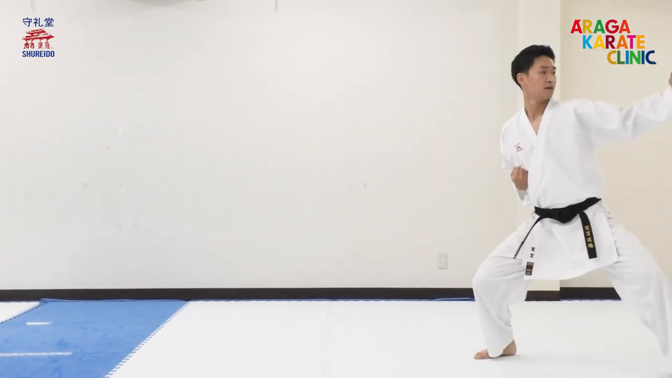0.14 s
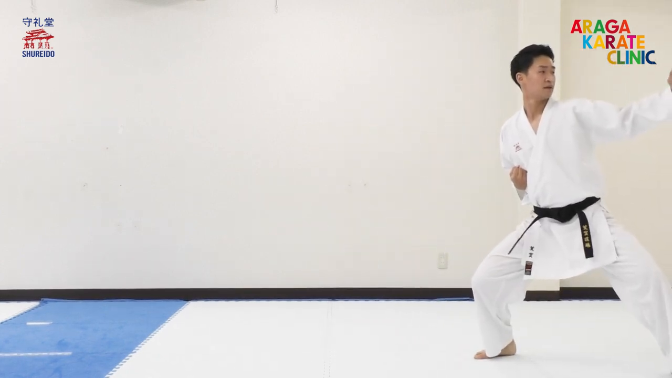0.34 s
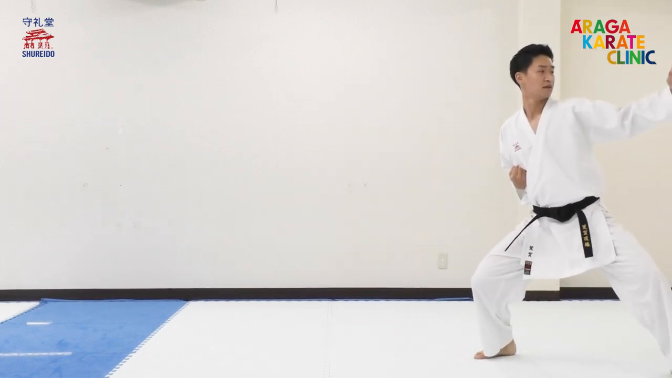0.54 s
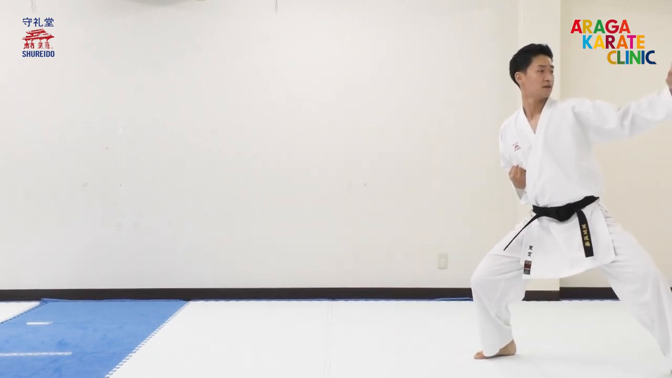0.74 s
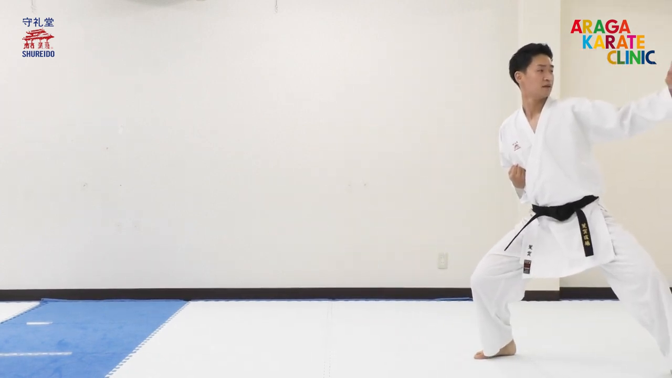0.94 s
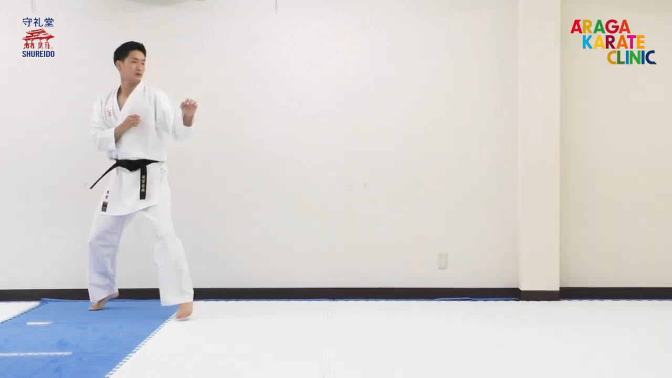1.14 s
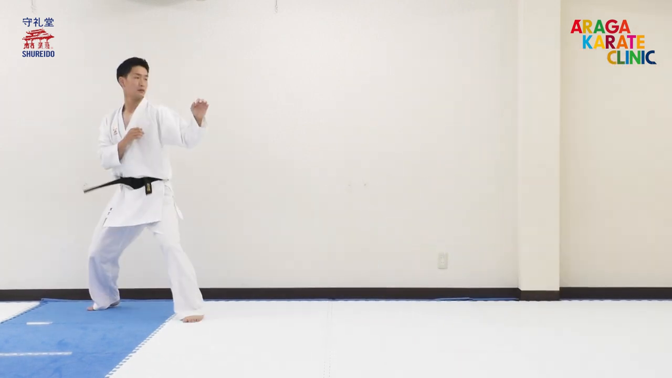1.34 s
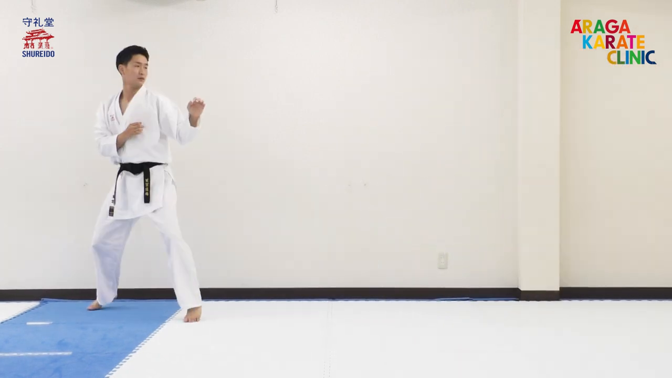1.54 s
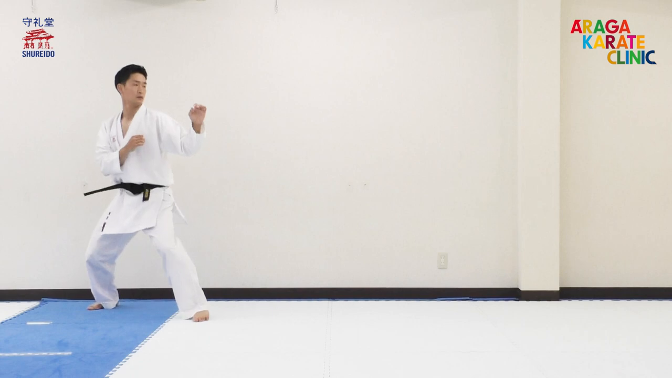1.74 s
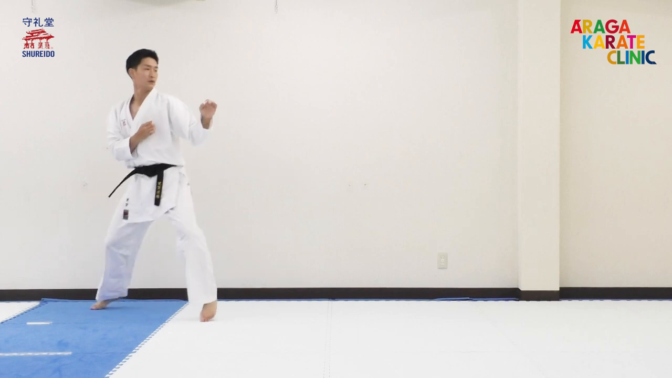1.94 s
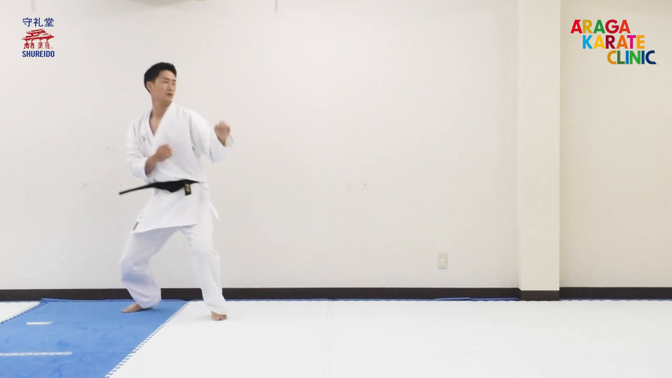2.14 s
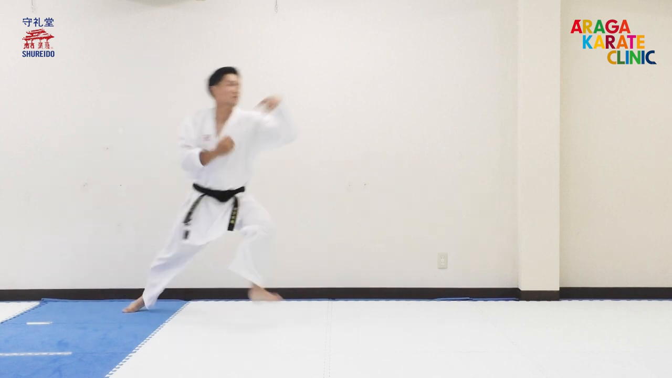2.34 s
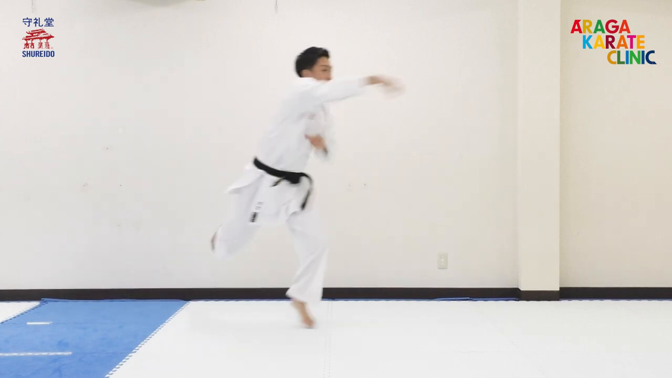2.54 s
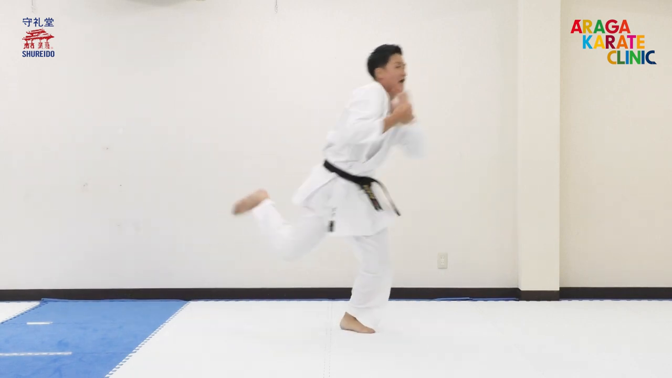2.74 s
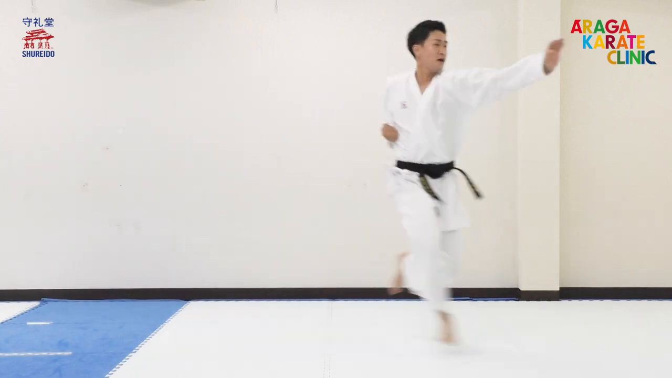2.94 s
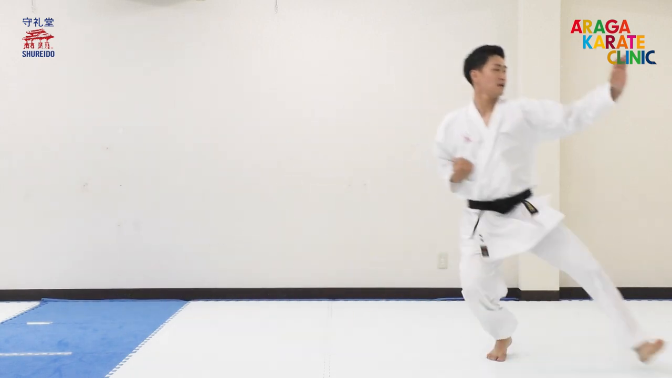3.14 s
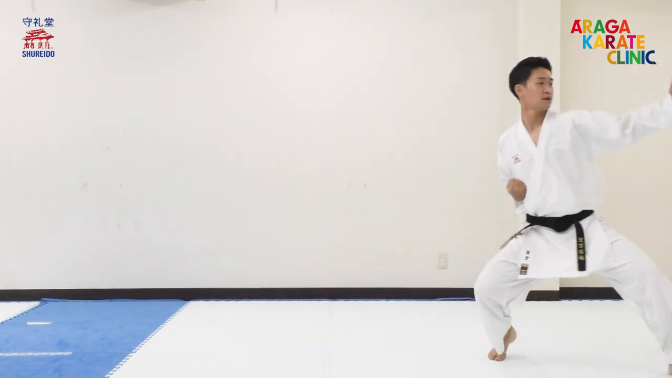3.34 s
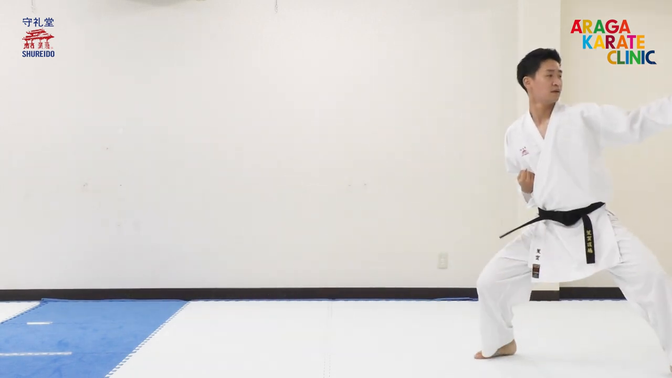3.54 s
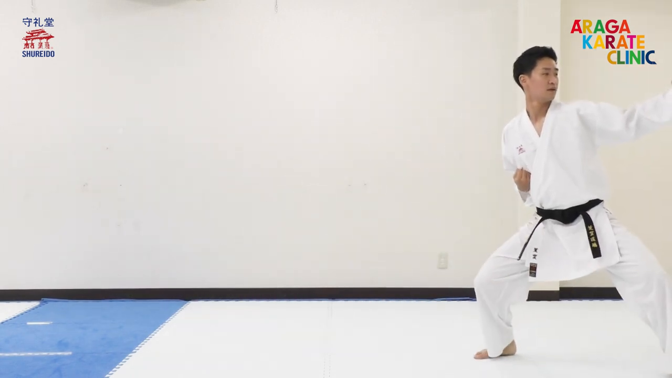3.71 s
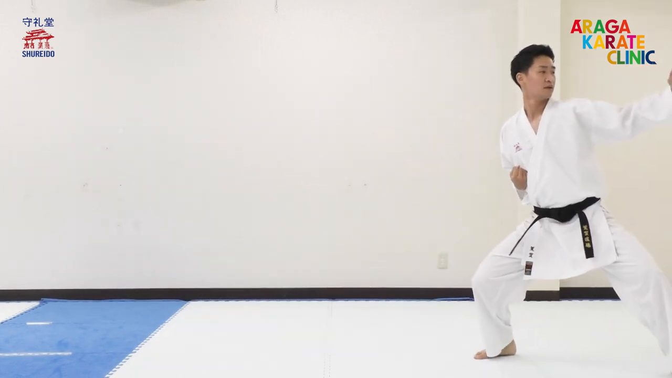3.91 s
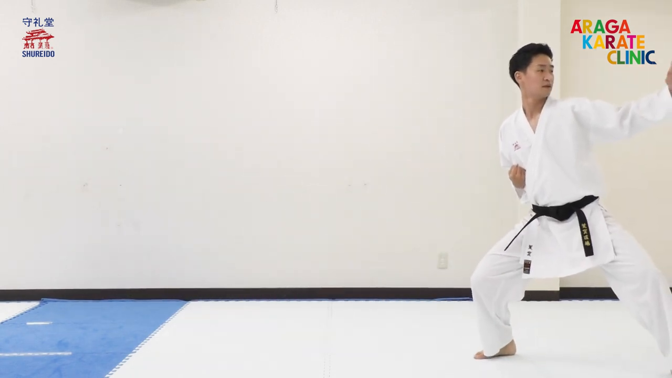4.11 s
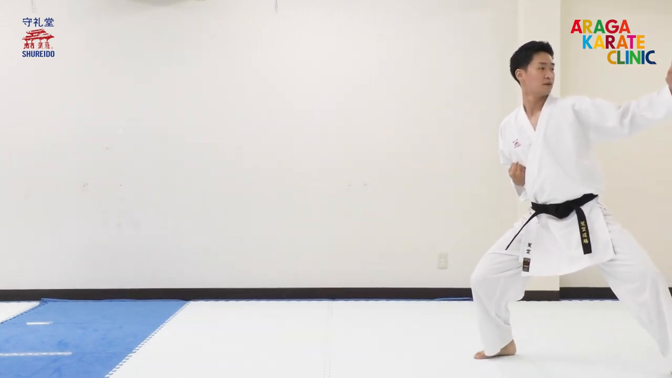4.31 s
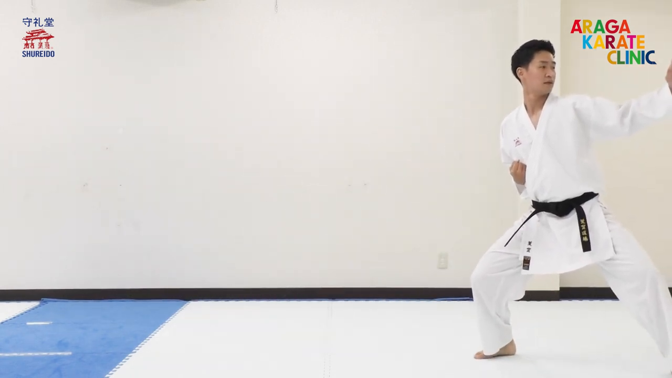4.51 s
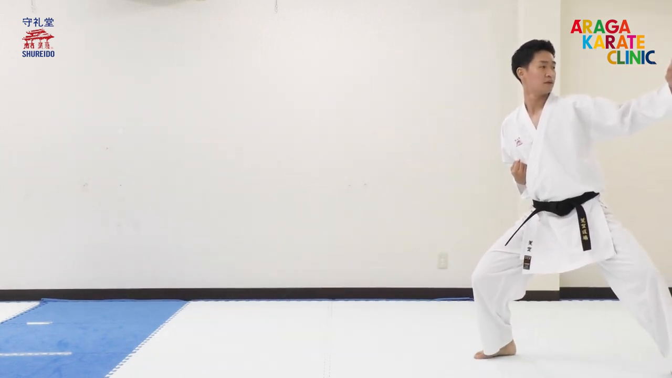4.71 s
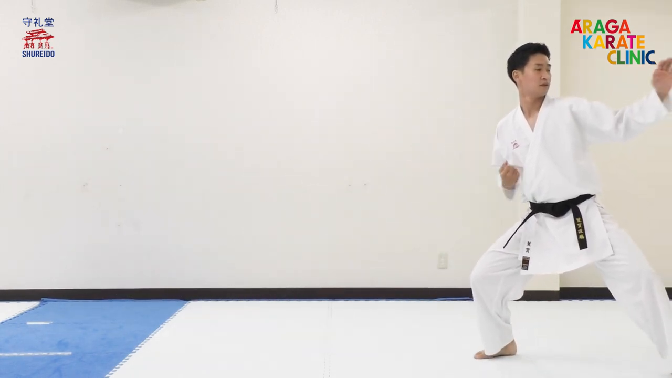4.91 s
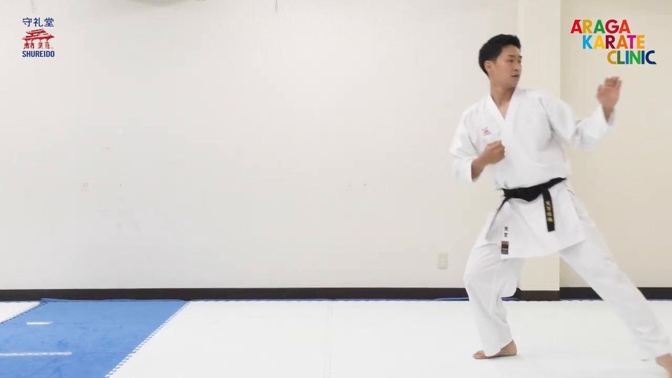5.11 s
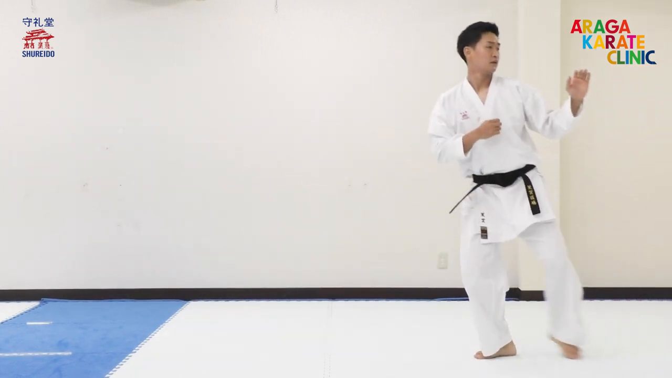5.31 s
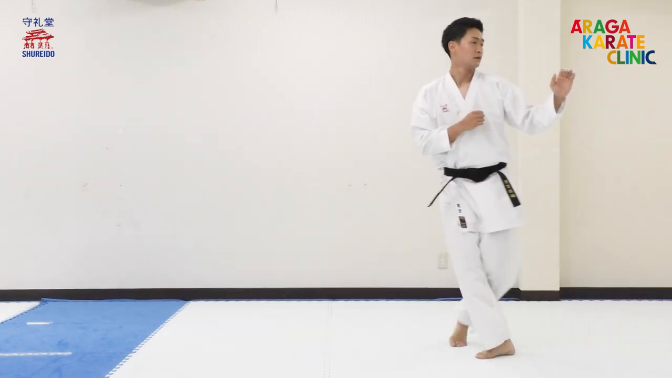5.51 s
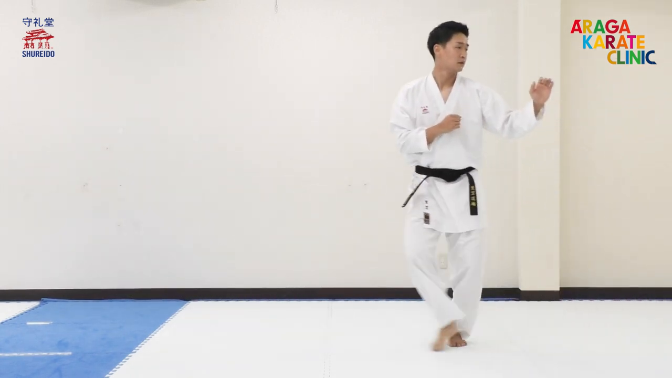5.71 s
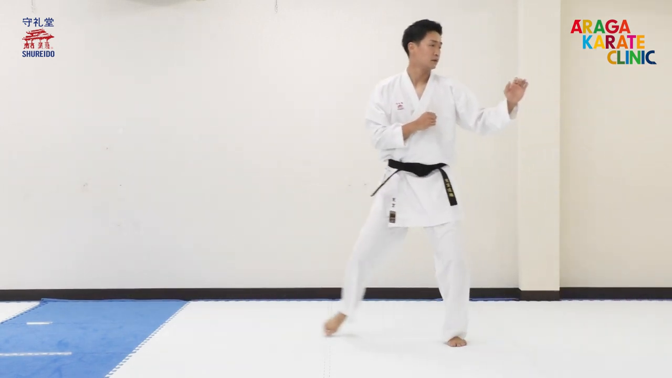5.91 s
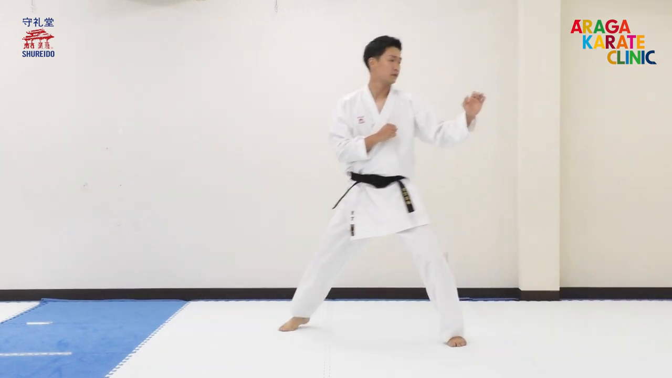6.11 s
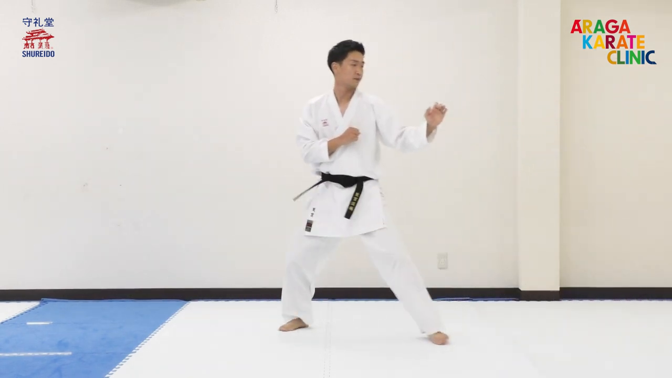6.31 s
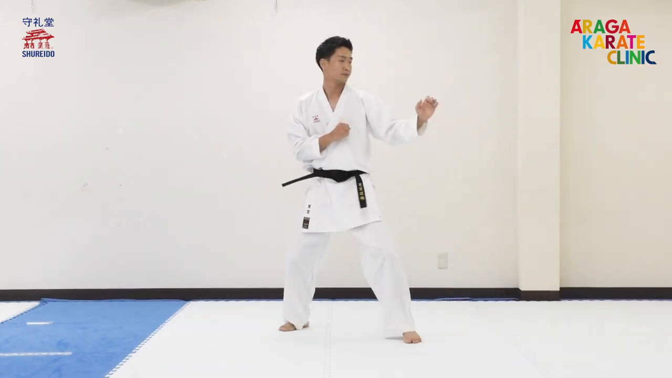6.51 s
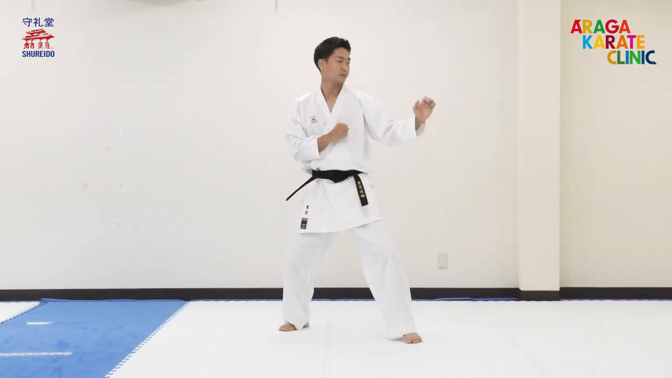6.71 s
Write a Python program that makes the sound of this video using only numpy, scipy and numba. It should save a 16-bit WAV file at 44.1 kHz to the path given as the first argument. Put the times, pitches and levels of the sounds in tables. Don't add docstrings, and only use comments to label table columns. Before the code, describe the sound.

A bare training room with a mat on a sprung floor, heard in stereo from a few metres. Until 1.1 s there is only very faint, dull distant rumble. Then the background cuts to soft low ventilation, with tiny ticks and scuffs of bare feet at 1.15-1.3 s and a light hop near 2.0-2.15 s. At 2.31-2.36 s stiff cotton snaps sharply; at 2.47 s the first lunge lands, a hard slap with a deep wooden boom. Boards knock and rumble unevenly as cloth flaps, until a contact at 3.06 s and the second stamp at 3.28 s, slightly duller, rattling away by 3.6 s. Only ventilation remains until 5.0 s. A trailing sole hisses along the mat at 5.2-5.4 s, a soft thud and rustle come at 5.6 s, a short skid at 5.77 s, faint shuffles near 6.2 s, and another airy drag from 6.35 s to the end.

```python
import sys
import numpy as np
from scipy import signal
from scipy.fft import rfft, irfft, next_fast_len
from scipy.io import wavfile
from scipy.ndimage import uniform_filter1d
from numba import njit

SR = 44100
rng = np.random.default_rng(int(sys.argv[2]) if len(sys.argv) > 2 else 0)


def amplitude_ratio(level_db):
    exponent = np.asarray(level_db, float) / 20
    return 10 ** exponent


def inscribe(sig):
    pcm = np.round(np.clip(np.atleast_2d(sig).T, -1, 1) * 32767)
    wavfile.write(sys.argv[1], SR, pcm.astype(np.int16))


N = 297670

# (frequency [Hz], density [dB per Hz])
WEAVE = [(1120, -26.5), (1900, -3.5), (2120, -5.5), (2340, 1), (2600, -3), (2960, -2), (4600, -15),
         (5980, -31.5), (10100, -120)]
# (frequency [Hz], density [dB per Hz])
SLOW_WEAVE = [(1500, -10), (2150, -1.5), (2600, -1), (3000, -3.5), (3400, -14.5), (5000, -18), (7000, -28)]


def unit(x):
    return x / np.sqrt(np.mean(x ** 2))


def gains_db(points, size):
    hz, db = np.transpose(points)
    bin_hz = np.arange(size // 2 + 1) * SR / size
    return np.interp(np.log(bin_hz + 1), np.log(hz), db)


def colour(x, points, size=4096):
    cepstrum = irfft(np.maximum(gains_db(points, size), -90) * np.log(10) / 20)
    cepstrum[1:size // 2] *= 2
    cepstrum[size // 2 + 1:] = 0
    h = irfft(np.exp(rfft(cepstrum)))
    return signal.oaconvolve(x, h / np.sqrt(np.sum(h ** 2)))[:N]


def ring(x, modes, rise_ms):
    t = np.arange(SR // 3) / SR
    h = np.zeros(len(t))
    for k, (hz, db, t60) in enumerate(modes):
        h += (-1) ** k * amplitude_ratio(db) * np.sin(2 * np.pi * hz * t) * 1000. ** (-t / t60)
    h = h * np.sin(np.pi / 2 * np.clip(t * 1000 / rise_ms, 0, 1)) ** 2
    h = signal.sosfilt(signal.butter(4, .8 * modes[0][0], "high", fs=SR, output="sos"), h)
    return signal.oaconvolve(x, h / np.sqrt(np.sum(h ** 2)))[:N]


def walk(rate):
    hold = int(SR / rate)
    steps = np.repeat(rng.standard_normal(N // hold + 1), hold)
    return 0.73 * uniform_filter1d(uniform_filter1d(steps, hold), hold)[:N]


def grains(rate, scatter_db, flutter_db, flutter_rate):
    hit = rng.random(N) < rate / SR
    size = amplitude_ratio(scatter_db * rng.exponential(size=N)) * rng.standard_normal(N)
    return unit(hit * size * amplitude_ratio(flutter_db * walk(flutter_rate)))


def strokes(rows, bend):
    onset_bend = 2
    t = np.arange(0, N + 32, 16) / SR
    s, db, rise_ms, fall_ms, tone = np.array(rows)[:, [0, 1, 2, 3, -1], None].transpose(1, 0, 2)
    late_ms = (t - s) * 1000
    away = np.abs(late_ms) / np.maximum(np.where(late_ms < 0, rise_ms, fall_ms), 1)
    level_db = db - 20 * away ** np.where(late_ms < 0, onset_bend, bend)
    power = amplitude_ratio(2 * np.maximum(level_db, -150))
    total = power.sum(axis=0)
    curves = 10 * np.log10(total), (power * tone).sum(axis=0) / total
    return [np.interp(np.arange(N) / SR, t, curve) for curve in curves]


def air(points, side_points, db, swell_db):
    size = 2 * next_fast_len(N // 2 + 1)
    bin_hz = np.arange(size // 2 + 1) * SR / size
    bass = 1 / (1 + (bin_hz / 300) ** 4)
    mid, side = rfft(rng.standard_normal((2, size))) * amplitude_ratio(gains_db(points, size))
    both = mid + side * amplitude_ratio(gains_db(side_points, size)) * np.array([[1], [-1]])
    low = irfft(both * bass)[:, :N] * amplitude_ratio(swell_db * walk(3.2))
    high = irfft(both * (1 - bass))[:, :N] * amplitude_ratio(0.13 * swell_db * walk(7.5))
    return unit(low + high) * amplitude_ratio(db)


def outdoor_rumble():
    # (frequency [Hz], density [dB per Hz])
    rumble = [(12, -55), (20, -14), (64, -7.5), (122, -12.5), (148, -20), (187, -28), (452, -26),
              (573, -28), (819, -32), (990, -38.5), (2570, -48), (4760, -41.5), (5900, -52), (7670, -76),
              (13000, -120)]
    # (frequency [Hz], side minus mid [dB])
    rumble_side = [(60, -7.5), (110, -6), (200, 1), (380, -0.5), (700, -3), (1290, -2), (2380, -10),
                   (4400, 1), (8120, 3), (15000, 0)]
    still = air(rumble, rumble_side, -61.5, swell_db=1.0)
    return signal.sosfilt(signal.ellip(8, .3, 50, 6150, fs=SR, output="sos"), still)


def ventilation():
    # (frequency [Hz], density [dB per Hz])
    duct = [(12, -48.5), (20, -28), (90, -9.5), (116, -12.5), (141, -9), (167, -1.5), (395, -10.5),
            (523, -20.5), (730, -23.5), (794, -30), (965, -22), (1940, -25.5), (4730, -39.5), (10000, -43),
            (15700, -36.5)]
    # (frequency [Hz], side minus mid [dB])
    duct_side = [(60, -10), (110, -2.5), (200, -10), (380, -7), (700, 1), (1290, -1), (2380, -1),
                 (4400, -1), (8120, -15), (15000, -1.5)]
    fan_hz, fan_db = 1970, -87
    t = np.arange(N) / SR
    fan = amplitude_ratio(fan_db) * np.sin(2 * np.pi * fan_hz * t + .8 * walk(2.7))
    return air(duct, duct_side, -61, swell_db=-1.5) + fan


def room(x):
    # (band centre [Hz], t60 [s], level [dB], side level [dB])
    bands = [(64.7, 0.6, 1, 2), (187, 0.83, -2.5, -15), (514, 0.3, 2, 0.5), (1395, 0.051, 7, 7.5),
             (3933, 0.62, 2.5, 1.5), (9990, .3, -20, 5.5)]
    t = np.arange(SR // 2) / SR
    tail = 0
    for hz, t60, db, side_db in bands:
        band = signal.butter(2, [hz / 1.7, min(hz * 1.7, 20000)], "band", fs=SR, output="sos")
        noise = signal.sosfilt(band, rng.standard_normal((2, len(t))))
        tail = tail + amplitude_ratio([[db], [db + side_db]]) * noise * 1000. ** (-t / t60) / np.sqrt(t60)
    tail = tail * np.clip((t - .003) / 0.0048, 0, 1) * amplitude_ratio(-49.5)
    mid, side = signal.fftconvolve(x[None], tail)[:, :N]
    return mid + side * np.array([[1], [-1]])


def mat_bounce(x):
    bounce = np.roll(signal.sosfilt(signal.butter(2, 5000, "high", fs=SR, output="sos"), x), 60)
    return amplitude_ratio(-9.5) * bounce * np.array([[1], [-1]])


def rebounds():
    # (peak time [s], level [dB], pitch [Hz], length [ms])
    rebound_knocks = [(2.4775, -12, 286, 27), (2.5182, -20.7, 290, 9.4), (2.5388, -26.5, 265, 8),
                      (2.5573, -20, 336, 14), (2.5713, -13.5, 304, 13), (2.59, -12, 233.5, 26),
                      (2.6221, -21.8, 260, 13), (2.6508, -18.5, 230, 11), (2.6794, -15.5, 290, 7.8),
                      (2.6932, -18, 228, 25), (2.7116, -20.5, 278, 21), (2.747, -14.5, 268, 5.1),
                      (2.769, -19, 271, 6.2), (2.797, -18, 250, 20), (2.8232, -12.5, 248, 5.6),
                      (2.8366, -19.3, 233, 12), (2.8578, -17, 210, 4.9), (2.873, -29.5, 302, 12),
                      (2.888, -26, 299, 3.9), (2.9099, -26, 261, 22), (2.9309, -23.5, 268, 8.9),
                      (2.9428, -32, 226, 19), (2.9593, -30, 291, 26), (2.9878, -35.8, 286, 6.3),
                      (3.018, -38.5, 233, 8.1), (3.041, -29, 262, 10), (3.0899, -22, 369, 25),
                      (3.1167, -31.1, 280, 3), (3.1335, -27.5, 384, 25), (3.1524, -30, 375, 7.5),
                      (3.171, -28, 324, 7.6), (3.197, -29, 319, 5.8), (3.2245, -32, 276, 29),
                      (3.242, -32, 316, 14), (3.2566, -48, 376, 8), (3.2852, -15.5, 268, 24),
                      (3.3042, -26, 273, 5.6), (3.3282, -22.5, 277, 32), (3.3481, -15, 214, 6.2),
                      (3.3677, -20, 227, 5.3), (3.381, -16.5, 222, 10.4), (3.4008, -15, 218, 16.4),
                      (3.437, -28.5, 229, 5.9), (3.4647, -29.1, 274, 19), (3.5021, -26.5, 226, 26),
                      (3.5268, -29, 232, 11.5), (3.5448, -32, 245, 23),
                      (2.481, -17, 162, 40),
        (3.33, -25, 165, 40),
        (5.602, -44.5, 411, 23),
        (5.614, -43, 188, 22),
        (5.644, -48, 151, 23),
    ]
    out = np.zeros(N)
    before = 1500
    late_ms = np.arange(-before, 4000) / SR * 1000
    for s, db, hz, ms in rebound_knocks:
        swell = np.exp(-(late_ms / min(0.38 * ms, 5)) ** 2)
        decay = 1 / np.cosh(late_ms / (0.42 * ms))
        shape = np.where(late_ms < 0, swell, decay)
        i = int(s * SR) - before
        out[i:i + len(shape)] += amplitude_ratio(db - 4) * shape * np.cos(2 * np.pi * hz * late_ms / 1000)
    return signal.sosfilt(signal.butter(2, 90, "high", fs=SR, output="sos"), out)


def floor():
    # (frequency [Hz], level [dB], t60 [s])
    boards = [(157.9, -2.5, 0.12), (185.4, -17, 0.58), (215.4, -1.5, 0.089), (259, -1, 0.077),
              (313.5, -3.5, 0.079), (347, -3, 0.042)]
    upper_boards = [(387.4, -0.5, 0.073), (428.8, 7, 0.047), (490, 0, 0.055), (565, -0.5, 0.041),
                    (643, -11.5, 0.048), (730, -40.5, 0.04)]
    joists = [(51.6, -1, 0.29), (72, -9.5, 0.099), (105.4, 0.5, 0.25)]
    # (peak time [s], level [dB], rise [ms], fall [ms], upper boards re level [dB])
    loads = [(1.128, -64.5, 4, 1500, -5), (1.312, -66, 240, 260, -2), (1.65, -65.5, 65, 100, 4),
             (2.135, -57, 4, 130, 5), (2.271, -63, 450, 120, -10), (2.334, -61, 28, 300, 17.5),
             (2.44, -48, 140, 25, 15.5), (2.468, -12.5, 6, 25, -4), (2.48, -23, 11, 200, -2.5),
             (2.578, -17.5, 85, 59, -10), (2.69, -20.5, 91, 400, -7.5), (2.81, -27, 360, 260, -11.5),
             (2.98, -46, 83, 180, -4.5), (3.062, -27.5, 8.5, 280, -4), (3.28, -18.5, 16, 180, -11.5),
             (3.325, -20, 26, 50, -24), (3.375, -21, 26, 44, -16), (3.402, -23, 13, 116, -12.5),
             (3.515, -37, 78, 76, -18.5), (5.592, -51, 15.4, 170, -16), (5.8, -59.5, 85, 270, -1),
             (6.245, -60.5, 28, 84, 3)]
    # (peak time [s], level [dB], rise [ms], fall [ms])
    sags = [
        (2.16, -60.5, 35, 230),
        (2.455, -30.5, 13, 57),
        (2.544, -52, 80, 80),
        (2.77, -36.5, 240, 65),
        (2.98, -46, 350, 83),
        (3.082, -47, 27, 400),
        (3.378, -50, 154, 61),
        (5.585, -60, 3.83, 337),
    ]
    shake_db, upper_db = strokes(loads, bend=1.31)
    contacts = grains(rate=2400, scatter_db=0.26, flutter_db=2.5, flutter_rate=35)
    sag = contacts * amplitude_ratio(strokes(sags, bend=1.1)[0] - 3.0)
    knocks = contacts * amplitude_ratio(shake_db - 3)
    upper = ring(knocks * amplitude_ratio(upper_db), upper_boards, rise_ms=9.5)
    t = np.arange(N) / SR
    loose = knocks * np.where((t > 2.452) & (t < 3.55), amplitude_ratio(-4.5), 1)
    return rebounds() + ring(loose, boards, rise_ms=5.4) + upper + ring(sag, joists, rise_ms=4.6)


def mat(scuffs):
    # (frequency [Hz], level [dB], t60 [s])
    foam = [(652, 1, 0.02), (795, -6, 0.024), (940, 0, 0.018), (1076, -3, 0.02), (1222, -2, 0.023)]
    panel = [(665.6, -2.5, .14), (737, -4, .09), (1170, -8, 0.045), (1494, -8.5, .05), (1835, -3, 0.054),
             (2014, -14, .04)]
    # (peak time [s], level [dB], rise [ms], fall [ms])
    presses = [(1.328, -56, 52, 124), (1.808, -68, 250, 230), (1.966, -73, 5.5, 530),
               (2.145, -56.5, 30, 180), (2.33, -44, 12, 68), (2.374, -37.5, 50, 62), (2.45, -47, 130, 23),
               (2.481, -26.5, 22, 5.8), (2.571, -42.5, 180, 52), (2.709, -36.5, 77, 214),
               (2.943, -57, 190, 190), (3.063, -29, 13, 17), (3.155, -40, 93, 28), (3.085, -38, 32, 190),
               (3.288, -30, 28, 31), (3.34, -41, 80.5, 84), (5.18, -67, 14, 180), (5.605, -57, 35, 215),
               (6.132, -70, 8, 140), (5.82, -69, 50, 180), (6.26, -64, 50, 150)]
    # (peak time [s], level [dB], rise [ms], fall [ms])
    rattles = [
        (2.73, -45.5, 39, 150),
        (3.29, -37, 8.6, 96),
        (3.35, -44.5, 38, 110),
        (3.43, -51, 49, 29),
        (3.52, -71, 60, 52),
    ]
    press = scuffs * amplitude_ratio(strokes(presses, bend=0.86)[0] - 2.5)
    t = np.arange(N) / SR
    heel = np.abs(t - 5.75) < .25
    soft = np.abs(t - 3.95) > 2.05
    out = ring(press * (~heel & ~soft), foam, rise_ms=1.0)
    out = out + ring(press * soft, foam[:3], rise_ms=1.2) + ring(press * heel, foam[1:], rise_ms=1.2)
    return out + ring(scuffs * amplitude_ratio(strokes(rattles, bend=0.69)[0]), panel, rise_ms=1.6)


def uniform(flaps, scuffs, slide):
    # (frequency [Hz], level [dB], t60 [s])
    folds = [(1316, -2, 0.021), (1522, -1.5, 0.021), (1652, -2, 0.012), (1944, -1, 0.013),
             (2197, -7, 0.0067)]
    # (peak time [s], folds level [dB], rise [ms], fall [ms], weave re folds [dB])
    lunge_flaps = [(2.312, -66.5, 7.1, 65, 10), (2.331, -56, 7, 42, 16.5), (2.364, -52, 4.4, 90, 13),
                   (2.44, -51, 90, 120, 3), (2.481, -43, 8, 20, 6), (2.571, -44.5, 89, 220, 0.5),
                   (2.709, -40, 117, 300, -2.5), (2.943, -50, 200, 190, -6.5), (3.063, -50.5, 10, 240, 1),
                   (3.15, -42, 63, 85, -8.5), (3.21, -47.5, 62, 100, -1), (3.266, -50, 90, 21, -27),
                   (3.288, -26.5, 5.9, 22, -14.5), (3.335, -37, 74, 162, -7.5), (3.5, -69, 103, 55, 3)]
    rustles = [(1.15, -74, 26, 100, 3.5), (1.242, -74.5, 8, 403, 4), (1.966, -73, 11, 200, 2),
               (1.7, -76, 110, 600, 1), (2.145, -62, 24, 60, -5), (2.24, -73.5, 103, 297, 1),
               (5.002, -75.5, 19.7, 299, 3), (5.282, -71.5, 300, 290, 4), (5.599, -52, 16, 110, -1.5),
               (5.653, -66, 99, 199.6, 5), (5.83, -68.5, 90, 150, -5), (6.251, -72.5, 360, 200.5, -2.5),
               (6.482, -73, 300, 298, 4)]
    folds_db, weave_db = strokes(lunge_flaps + rustles, bend=1.21)
    flapping = ring((flaps + 0.61 * scuffs) * amplitude_ratio(folds_db - 5.0), folds, rise_ms=0.61)
    rub = (flaps + 0.87 * slide) * amplitude_ratio(folds_db + weave_db - 5)
    calm = np.arange(N) > 4 * SR
    return flapping + colour(rub * ~calm, WEAVE) + colour(rub * calm, SLOW_WEAVE)


@njit
def svf(x, hz, share):
    y, band, low = np.empty(len(x)), 0., 0.
    for i in range(len(x)):
        g = np.tan(np.pi * hz[i] / SR)
        v = (band + g * (x[i] - low)) / (1 + g * (g + share[i]))
        band = 2 * v - band
        low = low + 2 * g * v
        y[i] = v * np.sqrt(share[i] / g)
    return y


def skin(slide):
    # (frequency [Hz], density [dB per Hz])
    skin_spectrum = [(1760, -31.5), (2450, -13.5), (3310, -1.5), (4130, -2), (5560, -0.5), (8300, -4.5),
                     (12100, -2.5), (12500, -6.5), (15700, -7.5)]
    # (peak time [s], level [dB], rise [ms], fall [ms], centre [Hz])
    skids = [(1.16, -72, 20, 67, 7500), (1.242, -65.5, 10, 57, 6600), (1.292, -72, 26, 69, 6800),
             (1.64, -70.5, 12, 94, 9200), (1.96, -65, 13, 49, 4900), (1.986, -59.5, 15, 67, 5100),
             (2.05, -56, 35, 95, 9205), (2.18, -64.5, 70, 72, 7300), (2.27, -72, 62, 60, 9000),
             (2.328, -48, 6.3, 110, 5100), (2.374, -52.5, 75, 50, 5370), (2.45, -49, 52, 36, 5900),
             (2.478, -46, 5, 24, 8000), (2.56, -60.5, 65, 140, 4870), (2.709, -51.5, 60, 113, 6900),
             (2.85, -62.5, 120, 150, 5800), (2.95, -53, 51, 100, 7040), (3.075, -42.5, 25, 134, 6850),
             (3.21, -64.5, 53, 97, 5860), (3.288, -41, 16, 15, 5470), (3.346, -44.5, 89, 104, 5830),
             (3.43, -57.5, 71, 110, 6360), (3.498, -55, 79, 65, 7470), (3.57, -71.5, 65, 78, 7130),
             (5.03, -77, 40, 88, 8000), (5.096, -64, 6.1, 34, 5430), (5.122, -66, 22, 88, 5800),
             (5.68, -58, 100, 240, 6300), (5.772, -51.5, 18, 85, 6040), (5.82, -67, 40, 56, 8000),
             (5.88, -76, 61, 75, 6000), (6.15, -64.5, 22.5, 66, 9050), (6.24, -77, 86, 79, 8000)]
    # (peak time [s], level [dB], rise [ms], fall [ms], centre [Hz])
    drags = [
        (5.195, -56.5, 31, 60.5, 8000),
        (5.26, -44, 63, 91, 9100),
        (5.305, -43, 100, 137, 8900),
        (5.44, -67, 80, 109, 5800),
        (6.345, -55.5, 22, 90, 8000),
        (6.415, -47.5, 97, 152, 8600),
        (6.485, -46, 90, 127.6, 7560),
    ]
    skin_db, centre_hz = strokes(skids + drags, bend=1.55)
    share = np.clip(.6 + .14 * (skin_db + 68), .6, 2.4)
    centre_hz = np.clip(centre_hz, 3000, 13000)
    once = svf(slide * amplitude_ratio(skin_db), centre_hz, share)
    hiss = svf(once, centre_hz, share) * np.sqrt(share * np.tan(np.pi * centre_hz / SR))
    return amplitude_ratio(-0.5) * colour(hiss, skin_spectrum)


def rubbing():
    scuffs = grains(rate=3200, scatter_db=3.0, flutter_db=2.5, flutter_rate=84)
    flaps = grains(rate=7000, scatter_db=2.07, flutter_db=4, flutter_rate=21)
    slide = grains(rate=24000, scatter_db=0.8, flutter_db=1.5, flutter_rate=34)
    return mat(scuffs) + uniform(flaps, scuffs, slide) + skin(slide)


def cracks():
    # (time [s], peak level [dB], top re peak [dB], thump level
    # [dB], length [ms])
    crack_events = [(1.1535, -55, -5, -55, 0.37), (1.2356, -54, -3, -49, 0.15),
                    (1.9589, -58.5, -13.5, -47.5, 0.64), (1.9818, -57, -13, -53, 0.38),
                    (2.312, -42, -18.5, -61.5, 0.5), (2.3262, -33.5, -21, -62, 0.34),
                    (2.3302, -30.5, -4, -52, 0.3), (2.358, -26.5, -14, -48, 0.6),
                    (2.4641, -18.5, -14, -4.5, 0.11), (2.472, -10, -12, -15.5, 0.67),
                    (3.058, -34, -12, -24, 0.11), (3.253, -48, -16, -28, 0.3),
                    (3.2772, -18.5, -24, -11.5, 0.15), (5.0923, -57, -12.5, -57, 0.3),
                    (5.5868, -41.5, -42, -51, 0.71),
                    (2.3335, -32, -4, -50, .5),
        (2.3608, -30, -9, -48, .5),
        (2.4655, -26, -15, -40, 4),
        (2.4735, -12, -25, -11, 1.6),
        (3.2798, -21, -26, -22, 1.5),
        (5.0005, -60, -15, -70, .3),
        (5.6025, -46, -40, -55, 1.5),
        (5.6105, -47, -40, -55, 1.5),
        (2.4742, -17, -22, -40, .3),
    ]
    # (frequency [Hz], level [dB], t60 [s])
    thump_modes = [(216.6, -12.5, 0.22), (316, 1.5, 0.025), (452, -14.5, 0.043), (630, -2.5, 0.018),
                   (1245, 10.5, 0.0067)]
    # (frequency [Hz], density [dB per Hz])
    sole_slap = [(500, -30), (1200, 0.5), (2000, -5.5), (2700, -4.5), (3400, -9.5), (4500, -13),
                 (8000, -31), (16000, -65.5)]
    heel_slap = [(290, -45), (500, -8), (1600, 5), (2330, -5.5), (2980, -3.5), (6140, -26.5), (16000, -61)]
    tick = [(1500, -30.5), (4000, -7.5), (6000, -1), (11500, 2.5), (15500, -15)]
    tail = 400
    body, heel, snap, top, fray, weight = np.zeros((6, N + tail))
    late_ms = np.arange(tail) / SR * 1000
    for s, db, top_db, thump_db, ms in crack_events:
        i = int((s + .0007) * SR)
        burst = .16 * rng.standard_normal(tail) * np.exp(-late_ms / max(ms, .05))
        burst[0] = -1
        if db < -26:
            main = snap
        else:
            main = body if s < 3 else heel
        treble = top if db >= -26 else fray
        main[i:i + tail] += burst * amplitude_ratio(db + 11)
        treble[i:i + tail] += burst * amplitude_ratio(db + top_db + 15)
        weight[i] += amplitude_ratio(thump_db + 14.5)
    top += signal.sosfilt(signal.butter(3, 8000, fs=SR, output="sos"), fray)
    calm = np.arange(N + tail) > 4 * SR
    cloth = colour(snap * ~calm, WEAVE) + colour(snap * calm, SLOW_WEAVE)
    slaps = colour(body, sole_slap) + colour(heel, heel_slap)
    return slaps + cloth + colour(top, tick) + ring(weight, thump_modes, rise_ms=4.5)


def scene():
    change_s = 1.126
    t = np.arange(N) / SR
    background = np.where(t < change_s, outdoor_rumble(), ventilation())
    near = floor() + rubbing() + cracks()
    return near + mat_bounce(near) + room(near) + background


def low_pass(x):
    return signal.sosfilt(signal.butter(12, 16470, fs=SR, output="sos"), x)


def record(dry):
    mix = signal.sosfilt(signal.ellip(10, .2, 70, 15800, fs=SR, output="sos"), dry)
    return low_pass(mix)


dry = scene()
out = record(dry)
inscribe(out)
```